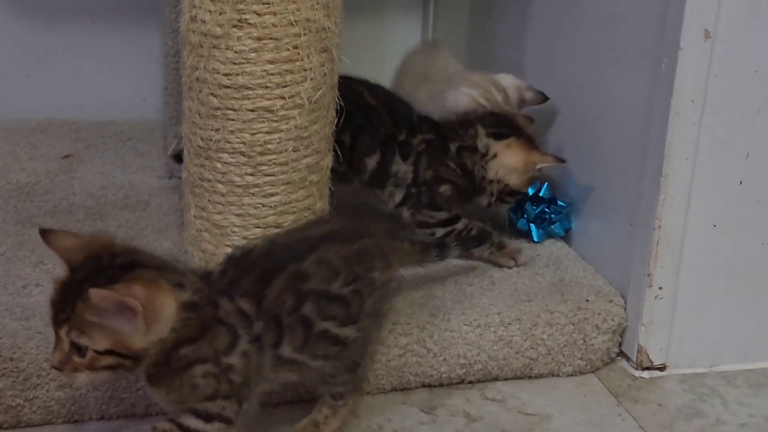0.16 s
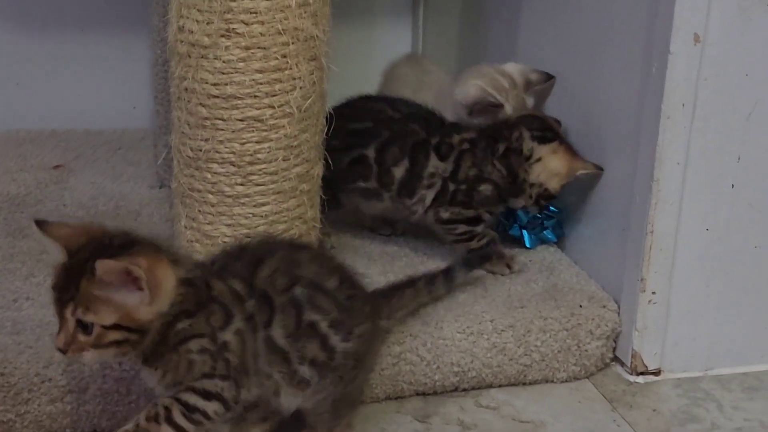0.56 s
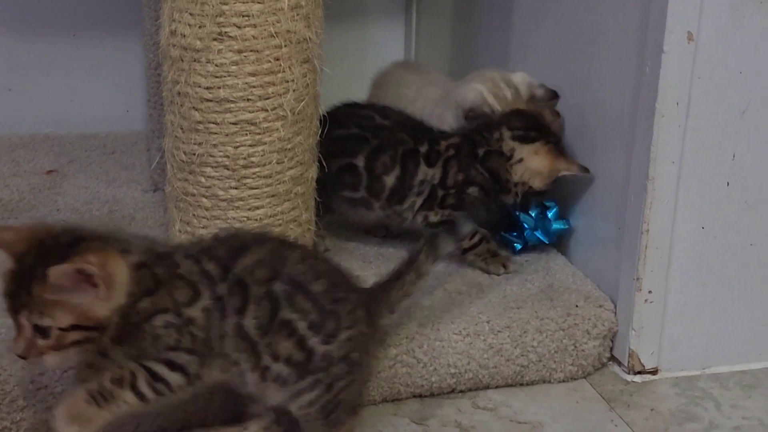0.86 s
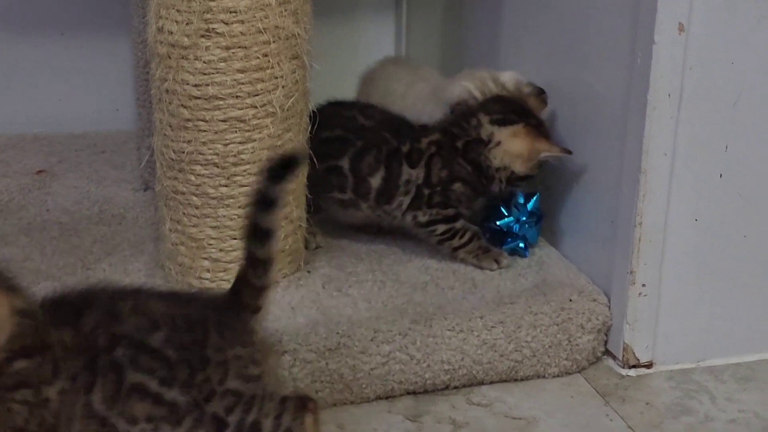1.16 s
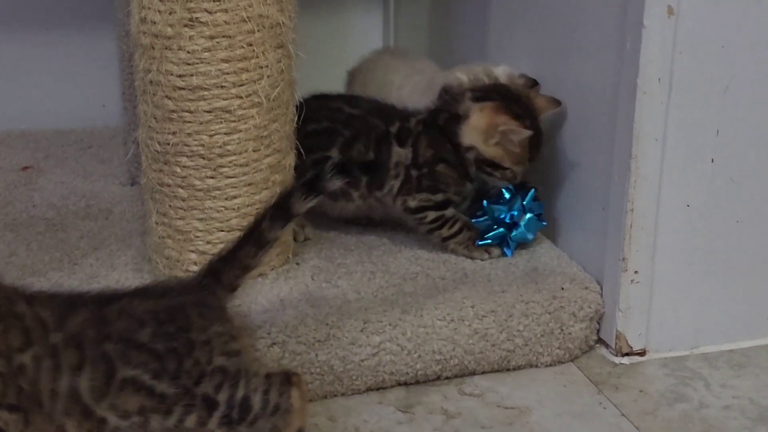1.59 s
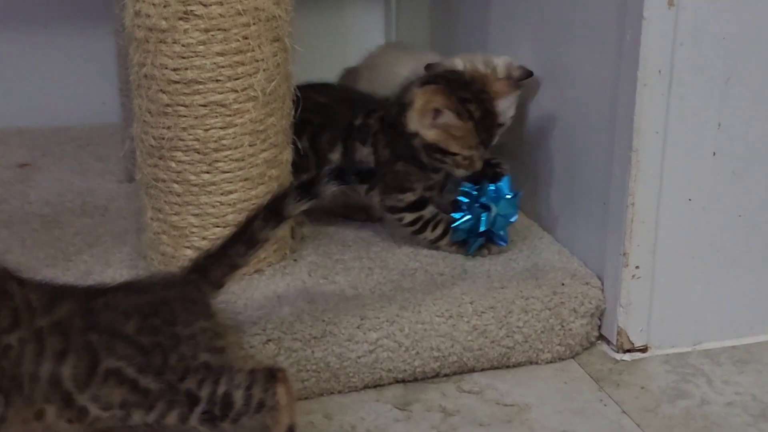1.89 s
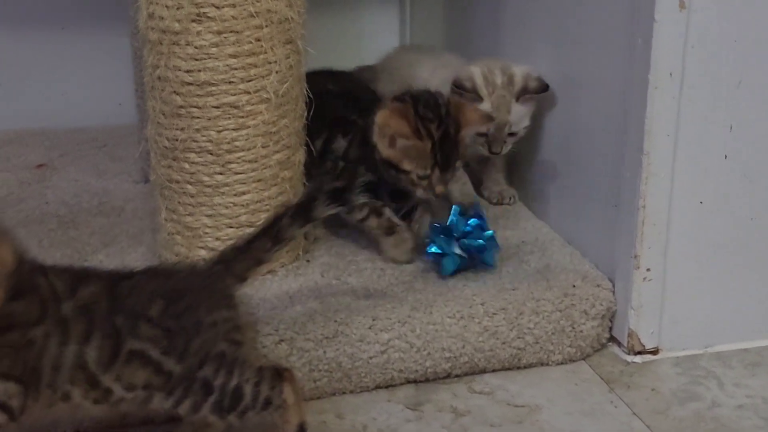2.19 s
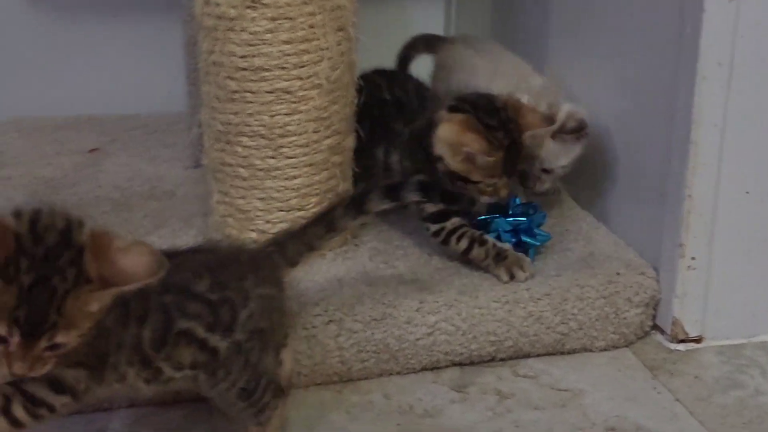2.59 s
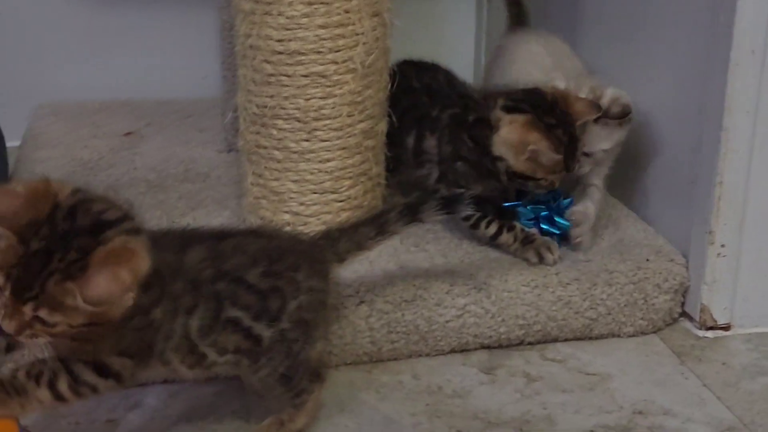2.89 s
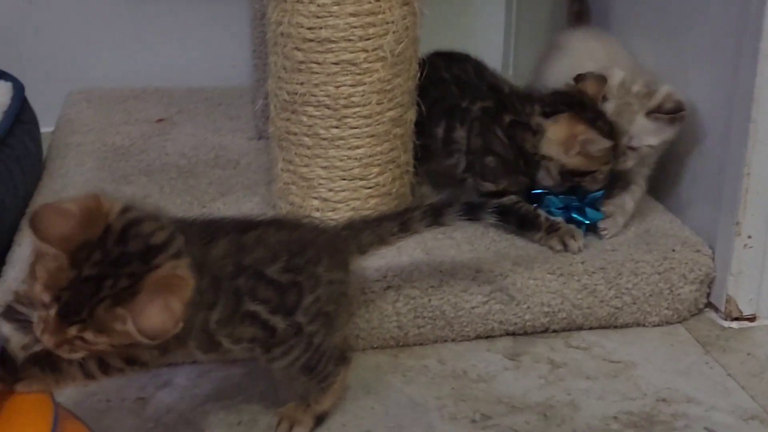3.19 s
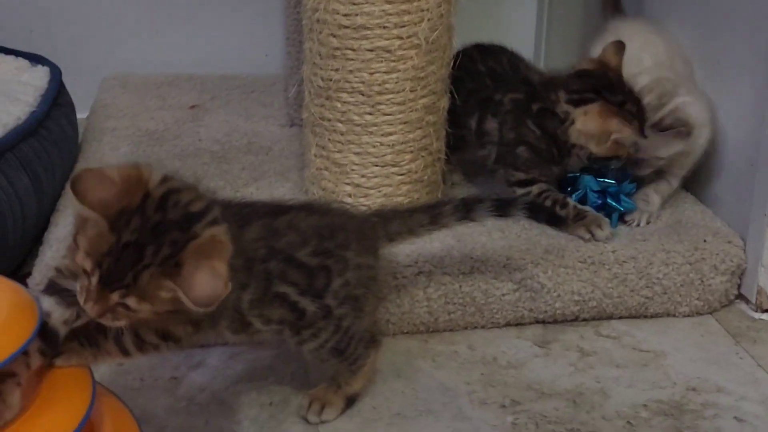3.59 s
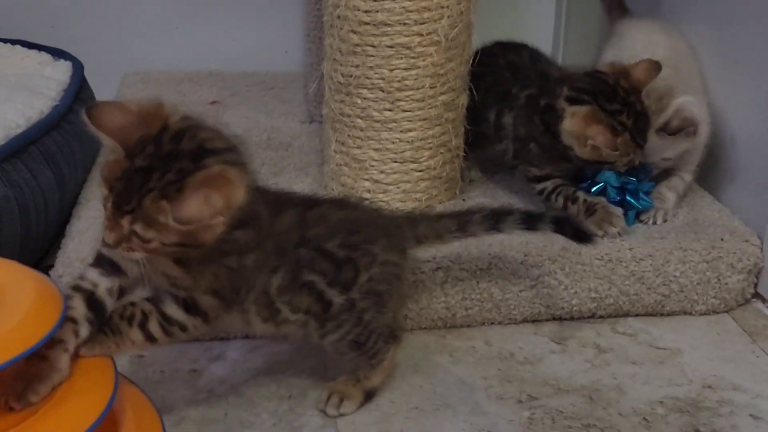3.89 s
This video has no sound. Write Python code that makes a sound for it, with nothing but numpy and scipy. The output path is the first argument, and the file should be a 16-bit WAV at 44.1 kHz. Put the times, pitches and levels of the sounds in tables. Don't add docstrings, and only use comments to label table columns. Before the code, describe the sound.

A foil bow crackles sharply as a kitten paws it, thumping a carpeted board over low hum

```python
import sys
import numpy as np
from scipy import signal
from scipy.fft import rfft, irfft
from scipy.io import wavfile
from scipy.ndimage import uniform_filter1d

SR = 44100
rng = np.random.default_rng(int(sys.argv[2]) if len(sys.argv) > 2 else 0)


def ratio(d):
    e = np.asarray(d, float) / 20
    return 10 ** e


def master_out(mix):
    frames = np.transpose(np.atleast_2d(mix))
    ceiling = np.clip(frames, -1, 1)
    pcm = np.round(ceiling * 32767).astype(np.int16)
    wavfile.write(sys.argv[1], SR, pcm)


N = 176400


def evened(x):
    return x / np.sqrt(np.mean(x ** 2) + 1e-30)


def read(points, hz):
    f, value = np.transpose(points)
    return np.interp(np.log(hz + 1), np.log(f + 1), value)


def colour(x, points, tilt_db=0, about_hz=5000, knee_hz=20):
    size = x.shape[-1]
    hz = np.fft.rfftfreq(size, 1 / SR)
    octaves = np.log2(np.maximum(hz, knee_hz) / about_hz)
    return irfft(rfft(x) * ratio(read(points, hz) + tilt_db * octaves), size)


def add(mix, s, sound, pan_db):
    part = mix[:, round(s * SR):][:, :len(sound)]
    part += sound[:part.shape[1]] * ratio([[pan_db / 2], [-pan_db / 2]])


def pair(same):
    a, b = rfft(rng.standard_normal((2, N)))
    return irfft(np.array([a, same * a + np.sqrt(1 - same ** 2) * b]), N)


# (frequency [Hz], rms [dB], width [Hz])
HUM = [(57.93, -68.5, 1.3), (92.8, -61.5, 7.6), (107.32, -57, 3.4), (118.3, -58, 0.54), (169, -73.5, 2.9),
       (242, -75.5, 18)]
# (frequency [Hz], density [dB per Hz])
RUMBLE = [(15, -21), (35, -1.5), (60, 4.5), (125, -1), (140, -7.5), (270, -19), (320, -22.5), (2000, -67)]
# (frequency [Hz], density [dB per Hz])
HISS = [(200, -54), (600, -5), (1000, -21), (4700, -22), (6300, -31.5), (8500, -22.5), (9800, -43.5),
        (16000, -34)]
# (frequency [Hz], left-right likeness [0-1])
LIKENESS = [(30, 0.73), (100, 1), (240, 0.67), (950, 0.091), (3770, 0.041), (15000, 0.024)]
RUMBLE_DB, HISS_DB, HUM_PAN_DB = -54.5, -76.5, 0.04


def background():
    hz = np.fft.rfftfreq(N, 1 / SR)
    same = np.clip(read(LIKENESS, hz), 0, .99)
    out = ratio(RUMBLE_DB) * evened(colour(pair(same), RUMBLE))
    out = out + ratio(HISS_DB) * evened(colour(pair(same), HISS))
    for tone_hz, db, width_hz in HUM:
        resonance = 1 / (1 + ((hz - tone_hz) / width_hz * 2) ** 2)
        out = out + ratio(db) * evened(irfft(rfft(pair(same)) * resonance, N))
    return out * ratio([[HUM_PAN_DB / 2], [-HUM_PAN_DB / 2]])


# (frequency [Hz], t60 [s])
ROOM = [(250, 0.2), (700, 0.31), (2000, 0.4), (5000, 0.27), (12000, 0.11)]


def room(x):
    taps = np.zeros((2, SR // 2))
    slots = np.arange(120, SR // 2 - 20, 20)
    at = slots + rng.integers(0, 20, (2, len(slots)))
    np.put_along_axis(taps, at, rng.choice([-1., 1.], at.shape), 1)
    hz, t, z = signal.stft(taps, SR, nperseg=256)
    decay = ratio(-60 * t / read(ROOM, hz)[:, None])
    tail = signal.istft(z * decay, SR, nperseg=256)[1]
    return signal.fftconvolve(x, tail / np.linalg.norm(tail[0]), axes=1)[:, :N]


# (time [s], level [dB])
SCUFF = [(0, -81), (.79, -82), (.83, -73), (1.05, -76.5), (1.3, -92), (1.65, -55), (1.92, -60.5),
         (2.03, -58), (2.12, -63), (2.3, -58.5), (2.47, -62.5), (2.6, -59), (2.76, -64.5), (2.85, -73),
         (3.0, -69.5), (3.4, -77.5), (4, -73.5)]
# (frequency [Hz], density [dB per Hz])
SCUFF_COLOUR = [(150, -30), (400, -7.5), (600, -1.5), (850, -5.5), (1400, -6.5), (2100, -13), (2900, -37),
                (9000, -73)]
SCUFF_DB, CLUMP_DB, SLIP_DB = 0.7, 3.2, 1.6


def scuff():
    level_db = np.interp(np.arange(N) / SR, *np.transpose(SCUFF))
    z = signal.stft(colour(pair(0.086), SCUFF_COLOUR), nperseg=512)[2]
    field = rng.standard_normal(z.shape[1:])
    clumps = evened(uniform_filter1d(uniform_filter1d(field, size=2, axis=0), size=9, axis=1))
    slips = evened(uniform_filter1d(field[0], size=3))
    uneven = z * ratio(CLUMP_DB * clumps + SLIP_DB * slips)
    friction = evened(signal.istft(uneven, nperseg=512)[1][:, :N])
    return ratio(level_db + SCUFF_DB) * friction


# (time [s], peak [dB], pitch [Hz])
THUDS = [(0.9, -32, 76), (1.173, -41, 546), (1.434, -48, 563), (2.35, -48.5, 300), (2.5, -53.5, 235),
         (1.8, -50, 84.5), (1.606, -42, 237), (2.8, -47.5, 214), (2.459, -39, 140), (3.3, -53.5, 263),
         (2.4, -48.5, 166), (2.1, -46.5, 269), (1.602, -34, 1300), (2.681, -45.5, 600), (2.9, -47, 680),
         (2.874, -50.5, 630), (3.099, -59, 850), (9.8, -59, 610)]
THUD_CYCLES, THUD_RISE_CYCLES, THUD_LONGEST_S = 54, 0.77, .14


def thuds():
    out, t = np.zeros((2, N)), np.arange(16000) / SR
    for s, db, hz in THUDS:
        decay_db_per_s = 60 * (hz / THUD_CYCLES + 1 / THUD_LONGEST_S)
        rise = 1 - np.exp(-t * hz / THUD_RISE_CYCLES)
        swing = rise * np.sin(2 * np.pi * hz * t)
        add(out, s, ratio(db - decay_db_per_s * t) * swing, 0)
    return out


# (frequency [Hz], level [dB], t60 [s])
BOX = [(446, -21, 0.07), (478, -16, 0.14), (566, 0.5, 0.038), (734, 1, 0.02), (864, -14.5, 0.012),
       (972, -12.5, 0.039), (1380, 1, 0.0089), (1590, 0, 0.0072), (1800, -1.5, 0.011), (2100, -8.5, 0.018),
       (2870, -14, 0.0056), (4080, -7.5, 0.0049)]


def box_ring(tilt_db, about_hz=600, detune=.02, size=6000):
    t = np.arange(size) / SR
    hz, db, t60 = np.transpose(BOX)[:, :, None]
    hz = hz * (1 + detune * rng.standard_normal(hz.shape))
    db = db + tilt_db * np.log2(hz / about_hz) + 1.5 * rng.standard_normal(hz.shape)
    return (ratio(db - 60 * t / t60) * np.sin(2 * np.pi * hz * t)).sum(0)


# (time [s], peak [dB], tilt [dB per octave], contact [s])
KNOCKS = [(0.813, -55.5, -13, 0.0025), (1.013, -58, -3, 0.0019), (1.153, -40, 6, 0.003),
          (1.172, -33.5, -8, 0.0042), (1.195, -38.5, 12, 0.0087), (1.354, -41, 8, 0.002),
          (1.403, -51.5, -15, 0.0061), (1.432, -59, 4, 0.0033), (1.575, -42.5, 18, 0.003),
          (1.6005, -21.5, 0.5, 0.0015), (1.611, -33, 4, 0.0094), (1.8, -47.5, 4.5, 0.0053),
          (2.001, -50, -2, 0.011), (2.202, -48.5, 0, 0.0029), (2.29, -47, -11, 0.0025),
          (2.331, -46.5, 2, 0.0045), (2.556, -77, 7, 0.0027), (2.724, -53, -0.5, 0.0048),
          (3.099, -64, 2, 0.00068), (3.258, -59, -1, 0.0013), (3.315, -56, -14, 0.0016),
          (3.591, -54, -1, 0.0037)]
KNOCK_PAN_DB = 1.5


def knocks():
    out, t = np.zeros((2, N)), np.arange(6000) / SR
    highpass = signal.butter(2, 330, "high", fs=SR)
    for s, db, tilt_db, contact_s in KNOCKS:
        push = rng.standard_normal(6000) * np.exp(-t / max(contact_s, .0005))
        push[0] = 4
        box = signal.fftconvolve(push, box_ring(np.clip(tilt_db, -6, 4)))
        box = signal.lfilter(*highpass, box)
        add(out, s, ratio(db) * box / abs(box).max(), KNOCK_PAN_DB)
    return out


GRAINS_PER_S, GRAIN_SPREAD_DB, FIZZ = 2500, 5, 0.41


def creases():
    t = np.arange(400) / SR
    facets_hz = np.geomspace(1500, 15500, num=30)
    struck = rng.random(N) < GRAINS_PER_S / SR
    size = struck * ratio(GRAIN_SPREAD_DB * np.minimum(rng.exponential(1, N), 3))
    which = rng.integers(0, len(facets_hz), N)
    envelope = np.exp(-t / 0.00035) * np.minimum(t / .0001, 1)
    ticks = np.zeros(N)
    for k, hz in enumerate(facets_hz):
        tick = hz / SR * np.sin(2 * np.pi * hz * t) * envelope
        ticks += signal.oaconvolve(size * (which == k), tick)[:N]
    return evened(ticks) + FIZZ * rng.standard_normal(N)


# (frequency [Hz], density [dB per Hz])
FOIL = [(300, -62), (1300, -5.5), (3500, -3.5), (6000, -0.5), (8700, 2), (10200, -14.5), (11500, -1),
        (16000, -16.5)]
# (start [s], length [s], rms [dB], tilt [dB per octave], strongest pitch [Hz])
RUSTLES = [(0.257, 0.033, -73.5, -9.5, 3700), (0.286, 0.062, -67.5, -9, 4560),
           (0.704, 0.036, -71.5, -2.5, 8550), (0.809, 0.066, -61, -5, 8500),
           (0.872, 0.068, -61.5, -3.5, 7800), (0.974, 0.088, -61, -2.5, 8240),
           (1.143, 0.084, -50.5, -1.5, 3370), (1.218, 0.14, -63, 2.5, 4070), (1.433, 0.13, -63, -4, 7600),
           (1.554, 0.075, -50, 5.5, 5200), (1.638, 0.087, -58, -1.5, 3920), (1.728, 0.036, -61, 7, 7100),
           (2.121, 0.23, -73.5, -3, 8250), (2.24, 0.095, -64.5, 12, 7000), (2.31, 0.09, -54, -4.5, 4400),
           (2.412, 0.033, -55.5, 3.5, 7700), (2.555, 0.13, -70, -0.5, 4350), (2.903, 0.16, -69, -4.5, 5560),
           (2.703, .09, -83.5, 5, 8400), (3.084, .07, -79.5, -4, 4300), (3.203, .16, -81, -2, 7150),
           (3.328, .2, -78.5, -4.5, 7740), (1.82, .33, -84.5, -1.5, 7060), (3.64, .36, -86, -3, 6000),
           (1.344, 0.17, -63, -5, 2580), (1.575, 0.09, -53, -34, 2820), (3.578, 0.06, -70.5, 0.5, 4300)]
HUMP_DB, HUMP_OCTAVES, RISE_SHARE, RUSTLE_PAN_DB = 6, 0.56, 0.27, -0.5


def rustles():
    out, grains = np.zeros((2, N)), creases()
    hz = np.fft.rfftfreq(16384, 1 / SR)
    for s, length_s, db, tilt_db, top_hz in RUSTLES:
        u = np.arange(0, length_s, 1 / SR) / length_s
        swell = np.sin(np.pi / 2 * np.minimum(u / RISE_SHARE, (1 - u) / (1 - RISE_SHARE)))
        hump = ratio(HUMP_DB * np.exp(-(np.log2((hz + 1) / top_hz) / HUMP_OCTAVES) ** 2))
        touch = colour(np.resize(grains[round(s * SR):], 16384), FOIL, tilt_db, knee_hz=3340)
        touch = evened(irfft(rfft(touch) * hump))[:len(u)]
        add(out, s, ratio(db) * swell * touch, RUSTLE_PAN_DB)
    return out


# (time [s], peak [dB], tilt [dB per octave], left-right [dB], loop pitch [Hz])
SNAPS = [(0.715, -59, 3, 7, 8500), (0.8392, -42, 2.5, 9, 7500), (0.882, -48, 10, 6, 7000),
         (0.992, -41, 0, 12, 8700), (1.016, -34, 6, -1, 5530), (1.156, -30, -6.5, 12, 5200),
         (1.165, -33.5, -13, 12, 2070), (1.1914, -20, 9, -4, 7400), (1.1905, -26, 7, 5, 12000),
         (1.3545, -43, -16, 0, 2630), (1.4048, -12.5, 2.5, 16, 6100), (1.4076, -10, 18.5, -6, 5600),
         (1.410, -21, 11, 18, 6340), (1.4152, -24, 16.5, -4, 8000), (1.417, -23, 6, -13, 12700),
         (1.6012, -13.5, -2.5, 13.5, 5570), (1.6017, -27, 8.5, -8, 3880), (1.604, -26, -9, -2, 2860),
         (1.605, -25.5, -9, -12, 1800), (1.702, -38, 0, -1, 6500), (1.7489, -31.5, -7, 0, 7540),
         (2.168, -48, 0, 9, 8600), (2.2432, -25.5, 9.5, 3, 6280), (2.3225, -52, 0, 4, 5000),
         (2.3304, -17.5, 2.5, 2, 4850), (2.351, -38, 10, -8, 6500), (2.4225, -31.5, -1.5, -9, 8000),
         (2.441, -47, 2, -10, 7500), (2.578, -52, -6, 6, 7400), (2.646, -45, 3, -1, 5900),
         (2.713, -46, 20, 1, 8800), (2.9138, -30, -1.5, 6, 6160), (2.971, -50, -6.5, -9, 3480),
         (3.594, -44, 9, 9, 4100), (3.204, -59, -1, 3, 7300), (1.741, -38, -8, 0, 7000)]
FLIP_S, FLUTTER, FLUTTER_S = .0005, .13, .005
LOOP_DB, LOOP_CYCLES = 4, 14


def snaps():
    out, t = np.zeros((2, N)), np.arange(2048) / SR
    lead = 100
    for s, db, tilt_db, pan_db, loop_hz in SNAPS:
        crack = rng.standard_normal(2048) * (np.exp(-t / FLIP_S) + FLUTTER * np.exp(-t / FLUTTER_S))
        crack[0] = 5
        loop = ratio(LOOP_DB - 60 * t * loop_hz / LOOP_CYCLES) * np.sin(2 * np.pi * loop_hz * t)
        crack = colour(np.roll(crack + loop, lead), FOIL, np.clip(tilt_db, -5, 5))
        add(out, s - lead / SR, ratio(db) * crack / abs(crack).max(), np.clip(pan_db, -6, 8))
    return out


SNAP_WET_DB, WET_DB, LAG_S = -6.5, 2, .0003


def scene():
    cracks = snaps()
    soft = rustles() + knocks()
    left, right = cracks + soft
    direct = np.array([left, np.roll(right, round(LAG_S * SR))])
    reverb = room(ratio(SNAP_WET_DB) * cracks + ratio(WET_DB) * soft)
    return direct + reverb + thuds() + scuff() + background()


def band_limit(x):
    return signal.sosfilt(signal.butter(12, 16810, fs=SR, output="sos"), x)


def record(dry):
    lowpass = signal.firwin(511, 15950, window=("kaiser", 9), fs=SR)
    wide = signal.oaconvolve(dry, lowpass[None], "same")
    wide = wide * np.minimum(np.arange(N) / 200, 1)
    return band_limit(wide)


dry = scene()
out = record(dry)
master_out(out)
```